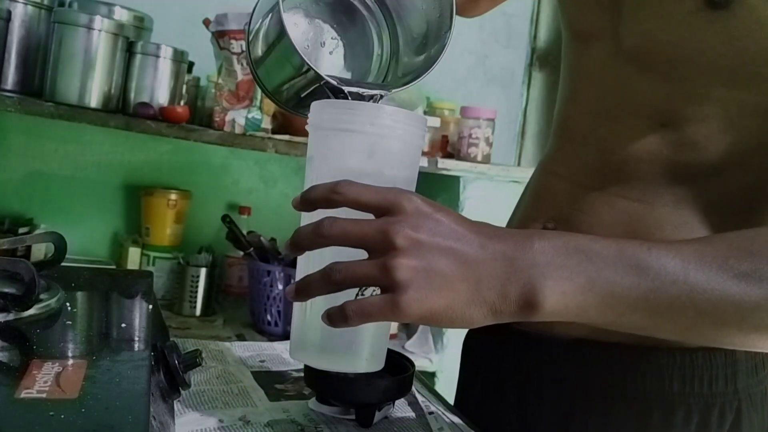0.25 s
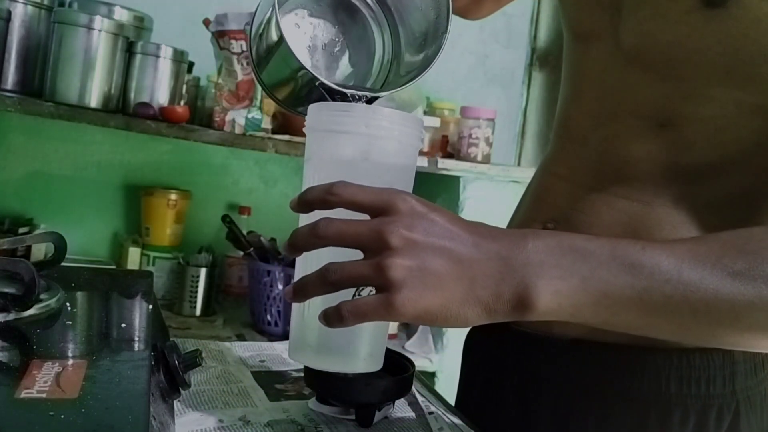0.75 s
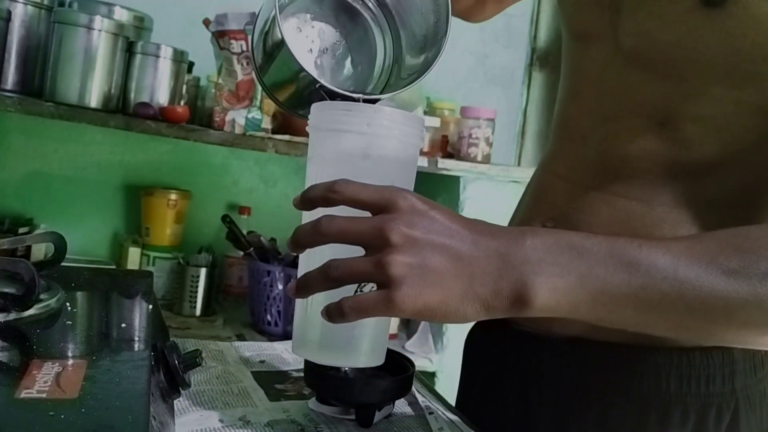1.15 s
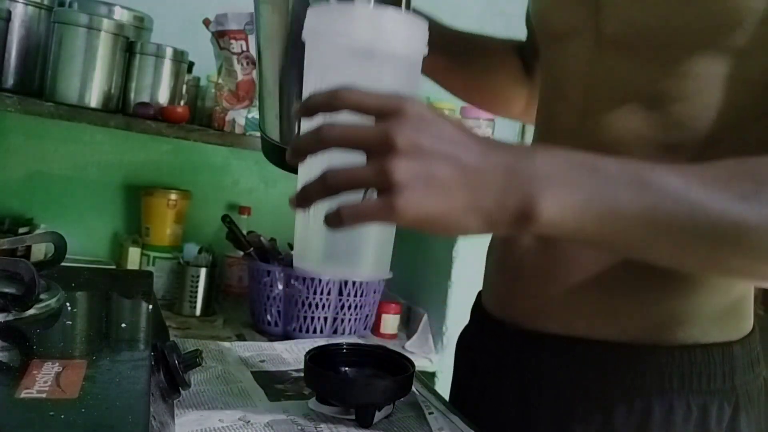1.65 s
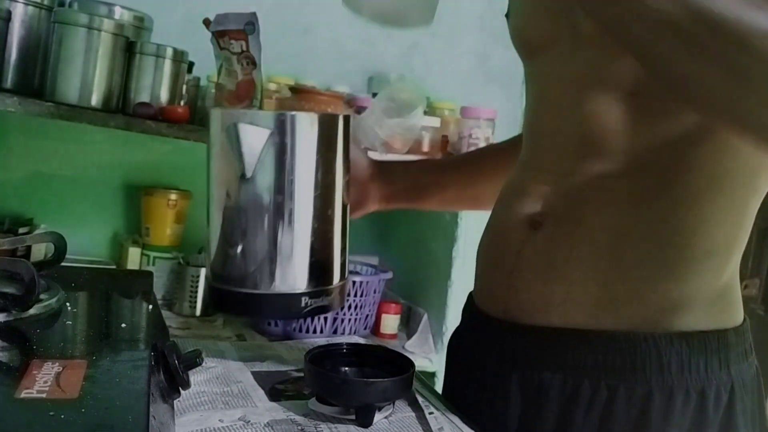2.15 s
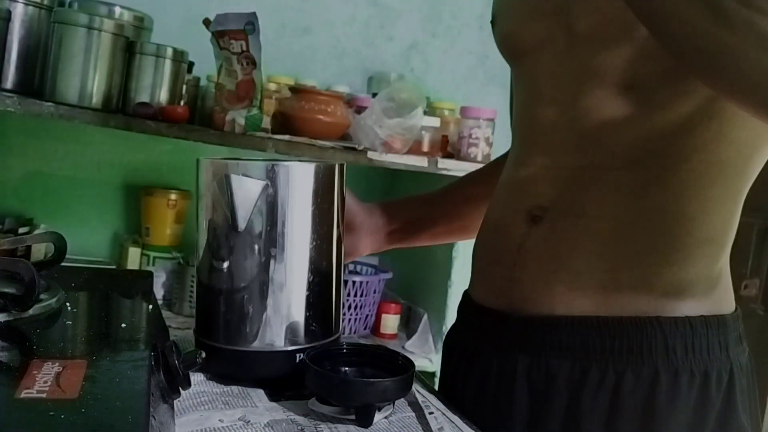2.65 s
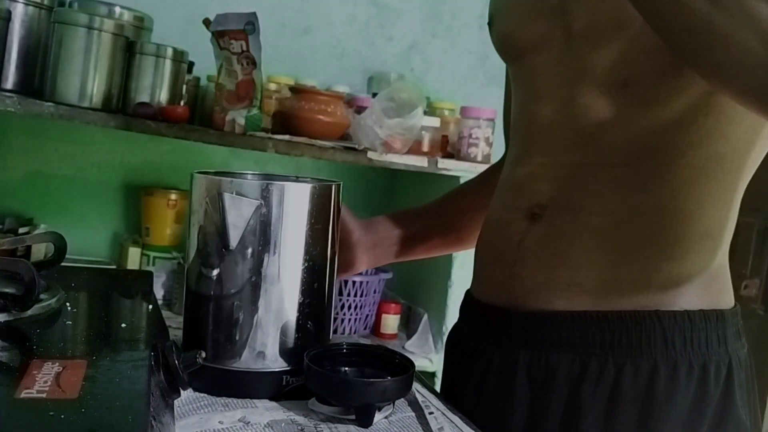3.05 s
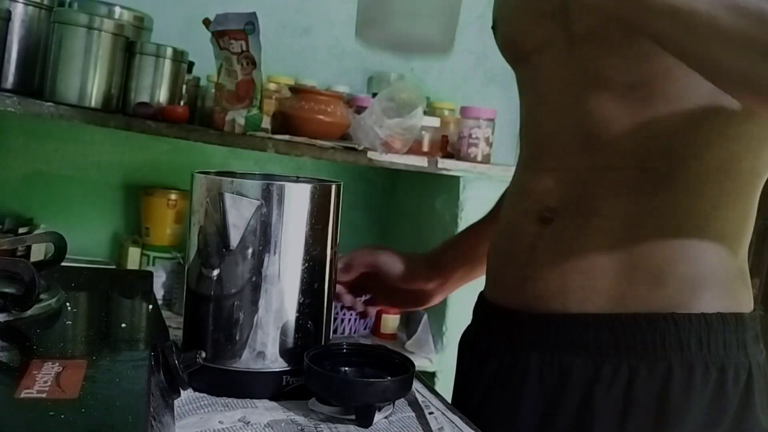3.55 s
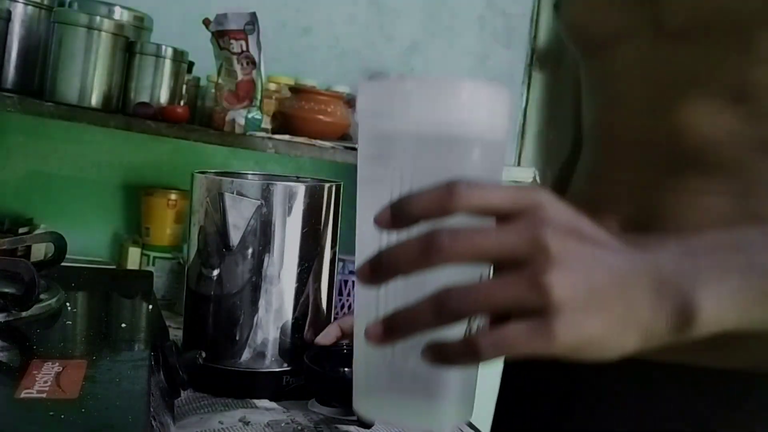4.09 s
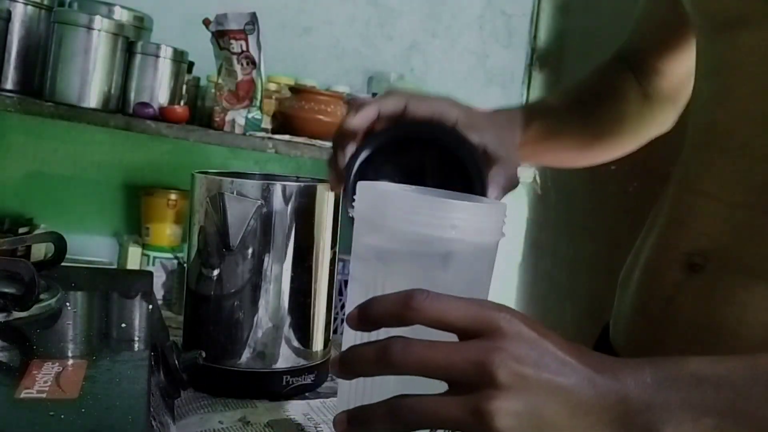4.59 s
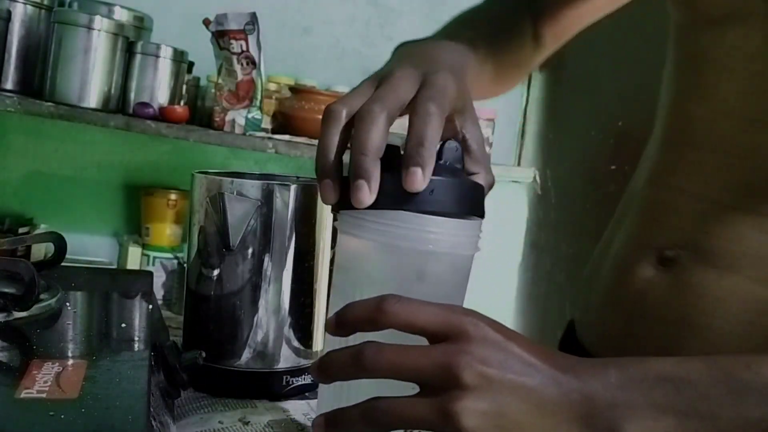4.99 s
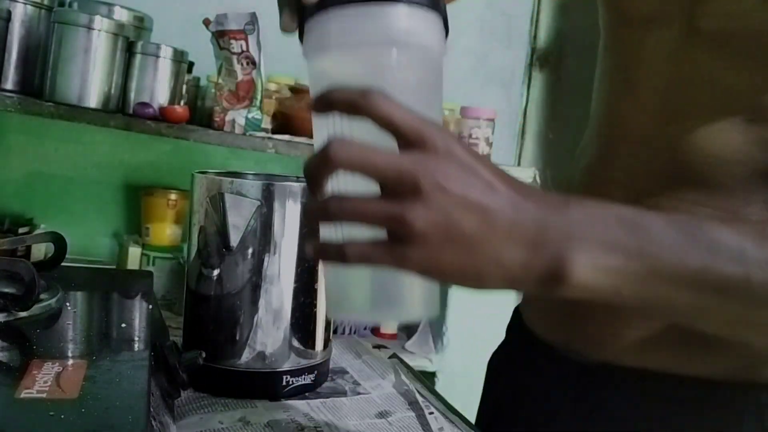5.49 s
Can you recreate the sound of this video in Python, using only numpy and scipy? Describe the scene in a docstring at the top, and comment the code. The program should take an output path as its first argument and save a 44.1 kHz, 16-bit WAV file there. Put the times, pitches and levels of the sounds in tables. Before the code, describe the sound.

Bright bubble plips and fine spray from a kettle's last dribble come first, with a faint distant horn to the right. Then the plastic bottle knocks, hard clicks scatter, and the metal kettle thuds twice quickly on the counter. Sparse handling rustles lead to sharp lid clicks, a thump, tiny squeaks and final bottle knocks. Close stereo pickup, short hard-room echo, deep engine rumble behind.

```python
"""Kettle and bottle in a small kitchen

Close up, the last of the water dribbles from a steel kettle into a plastic bottle: ringing bubbles and drops.
The kettle is set down, hands rub steel and plastic, and a lid is clicked and pressed on: dying rings and
shaped noise. Hard walls answer with a short decaying echo. Outside, traffic drones in wavering sines over
coloured noise, and a far horn sounds once as a cluster of rough tones. Two channels, left and right."""
import sys
import numpy as np
from scipy import signal
from scipy.fft import rfft, irfft
from scipy.io import wavfile

SR = 44100
rng = np.random.default_rng(int(sys.argv[2]) if len(sys.argv) > 2 else 0)


def unload_wav(signal):
    """Save mono or channel-first audio to the path in sys.argv[1] as 16-bit WAV at rate SR, clipped to [-1, 1]."""
    wavfile.write(
        sys.argv[1],
        SR,
        np.round(np.clip(np.atleast_2d(signal).T, -1, 1) * 32767).astype(np.int16),
    )


N = 252692   # samples

# Deep engine drone from the street. Each row: time [s], level [dB].
DRONE_LEVEL = [(0.0, -40.5), (0.06, -29.5), (0.27, -40), (0.57, -28.5), (0.64, -41), (0.72, -28),
               (0.8, -45), (1.02, -33), (1.07, -40), (1.16, -23), (1.26, -35.5), (2.6, -30), (2.86, -39.5),
               (2.9, -56), (2.97, -44.5), (4.02, -31), (4.12, -38.5), (4.84, -32.5), (4.91, -41),
               (5.12, -37.5), (5.19, -60), (5.23, -42), (5.39, -32.5), (5.51, -81), (5.54, -38),
               (5.73, -39)]
# Pitch of that drone. Each row: time [s], pitch [Hz].
DRONE_PITCH = [(0, 34.41), (0.95, 34.18), (1.4, 31.6), (5.35, 31.42), (5.5, 34.8)]
# Idling engines far off. Each row: pitch [Hz], level [dB], spread of the random pitch wander [Hz].
IDLING = [(16.9, -47.5, 1.47), (59.5, -56, 2.24), (120.5, -58.5, 4.17), (72.43, -49, 2.76),
          (148.2, -56.5, 3.07), (163.9, -58, 2.86), (180.5, -64.5, 4.13), (197.3, -69.5, 4.7),
          (225.9, -60, 5.28), (284.9, -60.5, 5.025)]
# Tones that swell and fade in the street noise, low hums and two higher ones.
# Each row: start [s], length [s], pitch [Hz], level [dB].
SWELLING_TONES = [(-0.2, 1.26, 82.9, -48), (0.295, 0.25, 498.5, -60.5), (0.966, 0.36, 610, -65),
                  (0.462, 0.14, 167.9, -49), (0.646, 0.39, 73, -46.5), (0.855, 0.31, 162, -49),
                  (1.071, 0.18, 45, -38.5), (1.326, 0.48, 284.8, -55.5), (1.5, 0.2, 161, -48.5),
                  (1.878, 0.92, 230.8, -47.5), (2.307, 0.48, 163.1, -48.5), (2.96, 0.43, 74.3, -48),
                  (3.05, 1.07, 229.4, -58), (3.353, 0.91, 201.8, -53.5), (3.65, 0.946, 72.06, -44.5),
                  (4.048, 0.49, 89, -44), (4.085, 0.47, 152.2, -46.5), (4.5, 1.9, 180.3, -55),
                  (5, 0.29, 72.7, -43), (5.218, 0.79, 147, -46.5)]
TONE_SWELL = 0.26   # share of a tone's length spent rising, and again falling
# One engine slows down: its note sags.
SLOWING_START_S, SLOWING_LENGTH_S, SLOWING_HZ, SAG_HZ_PER_S, SLOWING_DB = 0.2958, 3.77, 99.6, 5.7, -43
WAVER_DB = 1.47   # spread of the random level of the swelling tones and the slowing engine
# Broad street noise. Each row: time [s], level [dB].
STREET_LEVEL = [(0, -38.5), (1.4, -36), (2.4, -37.5), (3.1, -36.5), (4.2, -37.5), (5.2, -38.5),
                (5.73, -36.5)]
# Its spectrum. Each row: frequency [Hz], relative level [dB].
STREET_COLOUR = [(12, -41), (20, 6.5), (38, -2), (58, -11), (119, -17), (162, -15.5), (239, -23),
                 (418, -22.5), (495, -25.5), (555, -34.5), (612, -30), (720, -36), (900, -34.5),
                 (1280, -39), (1730, -38), (4870, -54.5), (8740, -57), (15700, -69.5)]
# Likeness of left and right, for street and echo. Each row: frequency [Hz], likeness [0 to 1].
LIKENESS = [(30, 0.99), (60, 1), (120, 0.96), (250, 0.6), (500, 0.38), (1000, 0), (3000, 0), (12000, 0.089)]

# Bubbles trapped by the dribble. Each row: time [s], level [dB], starting pitch [Hz], left over right [dB].
BUBBLES = [(0.135, -43.5, 1155, 5), (0.16, -50, 1130, 4), (0.225, -51, 1600, 0), (0.255, -48, 1720, -2),
           (0.35, -54, 1700, 0), (0.383, -51, 1680, 0), (0.425, -50, 1160, 5), (0.445, -46, 1600, -2),
           (0.66, -56, 1150, 0), (0.78, -51, 1550, 2), (1.188, -50, 1700, 0), (1.285, -51, 960, 0),
           (1.38, -50, 947.5, 0), (1.43, -54, 1740, 0), (0.2027, -52, 1070, 11), (0.2405, -40, 1666, -3),
           (0.405, -45, 1190, 15), (0.443, -48, 1280, -5), (0.454, -51, 1210, 5), (0.682, -53, 1680, 0),
           (0.737, -47, 1990, -2), (0.7517, -46, 1670, -2), (0.811, -40, 1790, -4),
           (0.827, -40.5, 1800, -1), (0.853, -46, 1645, -3), (1.016, -41.5, 1610, -2),
           (1.062, -43, 1605, -4), (1.099, -46, 1650, 0), (1.137, -47, 2030, 2), (1.188, -46, 2050, 0),
           (1.255, -49, 2060, 0), (1.316, -52, 980, 0), (1.336, -38, 1960, -2), (1.504, -39.5, 1468, -0.5)]
# Bursting droplets. Each row: time [s], level before the cluster's offsets [dB], middle pitch [Hz].
DROPLETS = [(.01, -46, 9900), (.205, -60, 4600), (.328, -48, 14870), (0.392, -52, 5840), (.425, -51, 15000),
            (0.494, -45.5, 7740), (.51, -50, 9700), (.012, -61, 3050), (0.558, -57, 2870), (.57, -60, 4300),
            (.606, -53.5, 3470), (.677, -65, 3300), (.602, -41, 8300), (0.673, -49, 14100),
            (.78, -50, 14600), (.885, -47, 9100), (.923, -55, 5740), (1.21, -54, 7340), (1.278, -50, 13700)]
# Fine spray of the stream. Each row: time [s], level [dB].
SPRAY_LEVEL = [(0, -72), (.14, -75), (.4, -69), (.7, -71.5), (.97, -75), (1.1, -71.5), (1.35, -78),
               (1.6, -89)]

# Decay of the kitchen's echo. Each row: frequency [Hz], t60 [s].
KITCHEN_T60 = [(200, 0.37), (1000, 0.2), (4000, 0.23), (9000, 0.13), (15000, 0.15)]
# Colour of the echo. Each row: frequency [Hz], relative level [dB].
KITCHEN_COLOUR = [(200, -10), (500, -7.5), (1500, -0.5), (4000, 1), (12000, 2)]
KITCHEN_DB = -0.5   # echo gain re the close sounds

HORN_START_S, HORN_LENGTH_S, HORN_PEAK_S, HORN_DB = 1.018, 0.46, 1.254, -65.5
HORN_CLIMB_DB, HORN_CLIMB_S, HORN_FADE_DB_PER_S = 18, 0.65, 70
HORN_HZ, HORN_SAG_HZ_PER_S = 448.3, 70   # the pitch whose multiples sound, and how it sags after the peak
# Rough horn tones at whole and half multiples of one pitch. Each row: multiple [ratio], relative level [dB].
HORN_TONES = [(6, -7), (6.5, -15), (7, 0), (7.5, -13), (8, -1), (9, -14)]

# Hollow knocks on the bottle. Each row: time [s], level before panning [dB], pitch [Hz], t60 [s].
KNOCKS = [(1.578, -18.5, 455.7, 0.032), (5.125, -39.5, 580, 0.062), (5.405, -27, 470, 0.033),
          (5.414, -16, 490, 0.026), (5.43, -32.5, 552, 0.087), (5.488, -42, 506, .07),
          (5.468, -31, 443, 0.059), (5.54, -46, 600, 0.049)]
KNOCK_SWELL_S, KNOCK_LEFT_DB = 0.0035, -4   # negative: louder on the right
# Sharp clicks. Each row: time [s], middle pitch of the wall's ring [Hz], level of each of its close
# modes [dB], their t60 [s], crack level [dB], left over right of the wall's ring [dB].
CLICKS = [(1.7144, 3060, -53, 0.034, -58, 0), (1.702, 5000, -70, .01, -65, 0),
          (1.7143, 3550, -47, 0.036, -64, -2), (1.722, 4000, -49, .03, -64, 1),
          (1.716, 4700, -54, .03, -68, 0), (1.739, 1950, -44, 0.028, -59, 0),
          (1.7325, 2110, -39, 0.025, -56, 0), (1.733, 1500, -56, 0.022, -66, 0),
          (1.741, 2670, -54, 0.016, -62, 0), (1.734, 6430, -54, .03, -62, 0),
          (1.752, 6300, -58, .03, -66, -2), (1.748, 2000, -48, 0.022, -57, -4),
          (1.758, 2000, -47.5, .025, -62, -4), (1.735, 4000, -51, .04, -66, 0),
          (1.76, 4000, -60, .03, -66, -2), (1.84, 4200, -62, .04, -70, 0), (1.785, 4100, -59, .03, -68, 0),
          (1.7, 4150, -61, 0.045, -70, -2), (1.826, 2050, -59, .05, -72, 0),
          (2.192, 3400, -60.5, 0.025, -65, -4), (2.8886, 3500, -63, .015, -52, 3),
          (2.888, 6100, -51.5, 0.011, -57, 4), (2.9445, 5000, -47, .009, -60, -4),
          (2.958, 6700, -54, .015, -64, 0), (2.957, 3600, -60, .012, -64, 0),
          (2.955, 1100, -52, 0.033, -62, 0), (2.98, 1500, -54, .025, -62, 0),
          (2.997, 1600, -56, 0.023, -65, 0), (3.4, 1450, -56, 0.023, -67, 0),
          (2.945, 1500, -52.5, 0.021, -54, -7), (2.964, 1240, -53, 0.02, -60, -7),
          (3.059, 1700, -60, 0.027, -63, -2), (3.095, 1250, -52.5, 0.026, -60, -4),
          (3.11, 1150, -55, .03, -64, -2), (3.124, 1500, -58, .025, -66, 0),
          (3.24, 1050, -52.5, 0.039, -56, 0), (3.15, 1280, -57, .025, -62, -2),
          (3.3, 1133, -53, 0.049, -57, -1), (3.831, 1800, -68, .019, -54, -1),
          (4.6244, 1630, -32.5, 0.013, -28.5, 0), (4.6246, 1400, -39, 0.0085, -60, 0),
          (4.645, 2600, -52, .02, -70, 0), (4.662, 810, -56, 0.036, -70, 0),
          (4.634, 1500, -44, 0.013, -44, 0), (4.644, 1800, -56, 0.023, -60, -2),
          (4.685, 1550, -58, .02, -68, 0), (5.2, 3400, -61, 0.027, -72, 0),
          (4.671, 1900, -52, 0.022, -62, 2), (4.706, 1500, -54, 0.016, -66, 0),
          (4.72, 1700, -58, 0.043, -70, 0), (4.74, 1200, -58, 0.033, -70, 2),
          (4.752, 1800, -59, .03, -72, 0), (4.765, 1900, -59, .03, -72, 0),
          (4.8625, 3600, -48, 0.034, -62, -2), (4.863, 3300, -46, 0.018, -62, 2),
          (4.865, 2320, -46.5, 0.064, -66, -5), (4.872, 1090, -44, 0.045, -62, 8),
          (4.886, 3100, -45, 0.02, -60, -2), (4.8637, 1210, -39.5, 0.028, -44.5, 2),
          (4.886, 2300, -61, 0.03, -50, -2), (4.895, 950, -57, .04, -66, 4),
          (5.123, 1740, -61, 0.02, -70, 4), (5.125, 2950, -54, 0.045, -74, -2),
          (5.201, 3800, -44, 0.042, -60, -2), (5.466, 3800, -60, .03, -70, 0),
          (5.1901, 1970, -40.5, 0.017, -34, -3), (5.193, 1030, -45, 0.018, -46, 7),
          (5.406, 1410, -57, .02, -59, 0), (5.412, 770, -48, .04, -64, 0), (5.54, 770, -54, .04, -66, 0),
          (5.4666, 1800, -61, .015, -55, -5), (5.7195, 1540, -46, 0.023, -44, -3)]
WALL_SPREAD = 0.13   # spread of the wall's close modes, share of the pitch
OVERTONE, OVERTONE_DB = 1.87, -11.5   # the wall's second mode: pitch ratio, level re the first
# Spectrum of the crack. Each row: frequency [Hz], relative level [dB].
CRACK_COLOUR = [(900, -14), (1500, -4), (3000, 3), (4600, 11.5), (6000, 7), (8500, 11.5), (11000, -1.5),
                (15700, -15)]
# Treble rings of the hard plastic. Each row: frequency [Hz], relative level [dB], t60 [s].
PLASTIC = [(2970, 5.5, 0.025), (7900, 2, 0.047), (3860, 6, 0.02), (4990, 6.5, 0.013), (6170, -1, 0.034),
           (8560, 0, 0.04), (8750, -5, 0.025), (10000, 0, 0.021), (11300, -20, 0.039)]
PLASTIC_DB, PLASTIC_LEFT_DB = -14, 4   # offset re the crack; the treble modes beam to the left
TREBLE_LEFT_DB = 0.3   # left over right, for crack and hiss
KETTLE_DOWN_S = 2.962
KETTLE_BOUNCE_S, KETTLE_BOUNCE_DB = 0.02695, -4.5   # it rocks and lands once more: delay, level re the first
# The kettle's body booms on the counter. Each row: frequency [Hz], level at first landing [dB], t60 [s].
KETTLE_MODES = [(232, -33.5, 0.27), (291, -30, 0.11), (340, -41, 0.23), (427, -48, 0.093),
                (527, -39, 0.051), (656, -55, 0.05)]
LID_HOME_S = 5.19
# The lid snaps home and thumps the full bottle. Each row: frequency [Hz], level [dB], t60 [s].
BOTTLE_MODES = [(286, -35, 0.092), (334, -27, 0.087), (392, -28, 0.067), (460, -25.5, 0.051),
                (596, -25, 0.026), (824, -51, 0.019)]
THUMP_SWELL_S = 0.0019   # for kettle and lid

# Bursts of rubbing noise and the noisy tails that follow clicks. Each row: time of full level [s],
# rise [s], hold [s], then the full levels of hiss [dB], body [dB] and hollow rumble [dB].
NOISE_BURSTS = [(1.731, 0.051, .005, -53.5, -57, -53), (1.802, .02, 0.034, -72, -79, -65),
                (2.076, 0.016, 0.0028, -54, -55.5, -52), (2.134, .02, .03, -79, -77, -61),
                (2.876, 0.035, 0.04, -69, -63, -68), (2.953, 0.044, .01, -62, -54.5, -55),
                (3.006, 0.067, 0.16, -65, -58.5, -60.5), (3.266, 0.1, 0.0082, -69, -64, -57),
                (3.831, 0.007, .003, -69, -81, -79), (3.893, 0.037, 0.061, -72, -65, -62),
                (4.18, .025, .02, -66, -78, -89), (4.215, 0.027, .005, -65.5, -64, -81),
                (4.27, 0.033, 0.009, -67.5, -73, -75), (4.5, 0.05, .01, -68, -72, -76),
                (4.648, 0.034, .01, -49.5, -50.5, -57), (4.716, 0.039, 0.06, -71, -58.5, -60),
                (4.862, 0.019, 0.0036, -56, -50.5, -59), (4.98, 0.062, 0.014, -71, -64, -81),
                (5.07, 0.096, 0.0046, -69, -63, -57), (5.12, 0.044, 0.065, -83, -60.5, -56.5),
                (5.204, 0.033, 0.0067, -53, -54.5, -72), (5.278, 0.076, 0.12, -69.5, -62, -84),
                (5.403, 0.012, 0.17, -70, -62, -52.5)]
# Spectrum of the bright hiss. Each row: frequency [Hz], relative level [dB].
HISS_COLOUR = [(2350, -16), (4000, -8.5), (4330, -17.5), (7380, -5), (9120, -4), (12300, -19.5),
               (15700, -21)]
# Spectrum of the duller body. Each row: frequency [Hz], relative level [dB].
BODY_COLOUR = [(700, 4.5), (1150, 3), (1700, 5), (2250, -4.5), (3050, -0.5), (3700, 1), (4500, -2),
               (6000, -19)]
# Spectrum of the hollow rumble. Each row: frequency [Hz], relative level [dB].
HOLLOW_COLOUR = [(300, -18), (450, 6), (650, -2), (900, -19), (1300, -38)]
BURST_CLIMB_DB = 24   # a burst gains this much during its rise
HISS_FADE, BODY_FADE, HOLLOW_FADE = 310, 285, 420   # dB per s after the hold
# Squeaks of rubbed steel and plastic, the kettle's base on the counter, then the lid's thread.
# Each row: time of full level [s], hold [s], level [dB], pitch [Hz], spread of the pitch wobble [Hz].
SQUEAKS = [(1.725, .02, -72, 14900, 500), (3.0, .025, -77, 3350, 200), (3.057, 0.0077, -71, 6200, 150),
           (3.072, .004, -70, 6560, 150), (3.098, .02, -69, 3300, 201), (3.15, 0.039, -73, 3310, 249.4),
           (3.263, 0.004, -72, 6100, 130), (3.265, 0.003, -73, 6700, 100), (4.82, 0.014, -70, 3030, 250),
           (4.95, 0.035, -69, 3230, 90), (5.061, 0.01, -72, 3270, 150), (5.248, 0.038, -63.5, 3100, 109.6),
           (5.3, 0.02, -65, 3150, 90), (5.33, 0.05, -67, 3080, 140), (5.41, 0.082, -68, 3087, 160)]
SQUEAK_RISE_S, SQUEAK_FADE_DB_PER_S, SQUEAK_FLUTTER_DB = 0.02, 550, 4
SQUEAK_WOBBLES_PER_S = 220

CUTOFF_HZ = 15800   # top of the finished sound


def amp(db):
    """dB to gain."""
    return 10 ** (np.asarray(db) / 20)


def rms_one(x):
    """Scale to rms 1."""
    return x / np.sqrt(np.mean(x ** 2) + 1e-20)


def level_in_time(rows):
    """Read a curve of time and value sample by sample."""
    s, value = np.transpose(rows)
    return np.interp(np.arange(N) / SR, s, value)


def span(rows, fade=0.0015):
    """1 while a curve lasts, 0 outside, with short fades inside its ends."""
    t = np.arange(N) / SR
    return np.clip(np.minimum(t - rows[0][0], rows[-1][0] - t) / fade, 0, 1)


def drift(rate):
    """Smooth random wander of rms 1; a higher rate [Hz] wanders faster."""
    r = np.exp(-80 * np.pi * rate / SR)   # computed at every 40th sample
    white = rng.standard_normal(N // 40 + 2002)
    slow = signal.lfilter([1], [1, -2 * r, r * r], white)[2000:]   # drop the filter's start-up
    return np.interp(np.arange(N) / 40, np.arange(len(slow)), rms_one(slow))


def at_hz(points, hz):
    """Read a table on a log-frequency axis."""
    points = np.array(points)
    return np.interp(np.log(hz), np.log(points[:, 0]), points[:, 1])


def colour(x, spectrum):
    """Give a wide noise a spectrum, silent beyond the table's ends; rms 1."""
    hz = np.maximum(np.fft.rfftfreq(N, 1 / SR), 1)
    edge = (hz > spectrum[0][0]) & (hz < spectrum[-1][0])
    return rms_one(irfft(rfft(x) * amp(at_hz(spectrum, hz)) * edge, N))


def tone(hz):
    """A sine of rms 1 on a pitch curve, from a random phase."""
    return np.sqrt(2) * np.sin(2 * np.pi * (np.cumsum(hz) / SR + rng.random()))


def swell(start, length, share):
    """A soft rise, a plateau and a soft fall."""
    t = (np.arange(N) / SR - start) / length
    return np.sin(np.pi / 2 * np.clip(np.minimum(t, 1 - t) / share, 0, 1)) ** 2


def burst(s, rise, hold, fade, rise_db=BURST_CLIMB_DB):
    """Gain that climbs to 1 at s by rise_db per rise, holds, then dies by fade dB per second."""
    t = np.arange(0, N, 16) / SR - s   # one gain for every 16 samples
    db = np.minimum(rise_db * t / rise, 0) - fade * np.maximum(t - hold, 0)
    return np.repeat(amp(db), 16)[:N]


def add(out, s, level_db, hz, t60, rise=0., attack=0.000081, left_db=0., lag=0):
    """Add one dying ring; its pitch climbs by the share rise per t60, and lag samples delay the left."""
    t = np.arange(int(t60 * SR)) / SR
    ring = np.sin(2 * np.pi * hz * (t + rise * t ** 2 / t60 / 2))
    wave = ring * amp(-60 * t / t60) * (1 - np.exp(-t / attack))
    for channel, side in enumerate((1, -1)):
        at = round(s * SR) + max(side * lag, 0)   # a negative lag delays the right
        out[channel, at:at + len(t)] += (amp(level_db + side * left_db / 2) * wave)[:max(N - at, 0)]


def street_tones():
    """Engine drones, swelling tones and one sagging note: wavering sines, the same in both channels."""
    tones = amp(level_in_time(DRONE_LEVEL)) * tone(level_in_time(DRONE_PITCH))
    for hz, level_db, wander_hz in IDLING:
        tones += amp(level_db + 2.54 * drift(4.1)) * tone(hz + wander_hz * drift(3.027))
    for s, length, hz, level_db in SWELLING_TONES:
        level = amp(level_db + WAVER_DB * drift(21))
        tones += level * swell(s, length, TONE_SWELL) * tone(np.full(N, hz))
    sagging = SLOWING_HZ - SAG_HZ_PER_S * (np.arange(N) / SR - SLOWING_START_S)
    level = amp(SLOWING_DB + WAVER_DB * drift(7.7))
    tones += level * swell(SLOWING_START_S, SLOWING_LENGTH_S, 0.33) * tone(sagging)
    return tones


def street():
    """Tones over a broad rumble whose left and right part toward the treble."""
    mid, side = rng.standard_normal((2, N))
    alike = np.clip(at_hz(LIKENESS, np.maximum(np.fft.rfftfreq(N, 1 / SR), 1)), 0, 1)
    mid = irfft(rfft(mid) * np.sqrt(1 + alike), N)
    side = irfft(rfft(side) * np.sqrt(1 - alike), N)
    noise = np.array([colour(mid + side, STREET_COLOUR), colour(mid - side, STREET_COLOUR)])
    return street_tones() + amp(level_in_time(STREET_LEVEL)) * noise


def bubbles_and_droplets():
    """Trapped air rings and climbs in pitch; droplets burst as little clusters of rings."""
    out = np.zeros((2, N))
    for s, level_db, hz, left_db in BUBBLES:
        add(out, s, level_db, hz, 40 / hz, rise=0.083, attack=0.00075, left_db=left_db, lag=3)
    for s, level_db, hz in DROPLETS:
        for k, (late, size) in enumerate(rng.random((14, 2))):
            ring_hz = hz * (1 + 0.14 * (size - 0.5))
            add(out, s + 0.0016 * k * late, level_db - 3.5 - 0.61 * k, ring_hz, 45 / hz, rise=0.042, lag=2)
    for when, size, force in rng.random((300, 3)):   # the many faint bubbles between the clear ones
        hz = 900 * 3.21 ** size
        add(out, 1.45 * when, -60 + 12 * force, hz, 30 / hz, rise=0.18, attack=0.0041, lag=3)
    return out


def spray():
    """A dense crackle of tiny rings: small drops ring high, large ones low."""
    out = np.zeros((2, N))
    for when, size, force, where in rng.random((4000, 4)):
        hz = 15000 * 5.18 ** -size
        level_db = -3.2 * np.log(force + 0.02) - 16.0 * size
        lag = int(12 * where - 6)
        add(out, 1.8 * when, level_db, hz, 30 / hz, rise=0.072, attack=0.00034, lag=lag)
    level = amp(level_in_time(SPRAY_LEVEL) + 1.1 * drift(22)) * span(SPRAY_LEVEL)
    return level * out / np.sqrt(np.mean(out[:, :int(1.6 * SR)] ** 2))


def water():
    """The dribble close by: bubbles, droplets and spray."""
    return bubbles_and_droplets() + spray()


def kitchen(x):
    """Dense echoes off tiles and pots: decaying noise, alike on both sides in the bass, not in the treble."""
    t = np.arange(SR // 2) / SR
    echo, white = 0, rng.standard_normal((2, len(t)))
    for low in 125 * 2. ** np.arange(7):   # each octave dies at its own rate
        octave = signal.butter(2, [low, 2 * low], "band", fs=SR, output="sos")
        band = signal.sosfilt(octave, white)
        alike = np.clip(at_hz(LIKENESS, low), 0, 1)   # long waves reach both microphone ports alike
        band = alike * band[0] + np.sqrt(1 - alike ** 2) * band
        decay_db = -60 * t / at_hz(KITCHEN_T60, 1.36 * low)
        echo = echo + band * amp(at_hz(KITCHEN_COLOUR, 1.4 * low) + decay_db)
    echo = echo * np.clip(t / 0.005, 0, 1)   # the echo builds up over the first 5 ms
    return signal.fftconvolve(x, echo / np.sqrt(np.sum(echo ** 2) / 2), axes=1)[:, :N]


def horn():
    """Rough horn tones at whole and half multiples of one pitch, fluttering in level and pitch."""
    sag = np.clip(HORN_SAG_HZ_PER_S * (np.arange(N) / SR - HORN_PEAK_S), 0, 7)   # 7 Hz at most
    pitch = HORN_HZ + 1.2 * drift(40) - sag
    tones = np.zeros(N)
    for k, level_db in HORN_TONES:
        tones += amp(level_db + 2.8 * drift(35)) * tone(k * pitch + 13 * drift(90))
    blown = burst(HORN_PEAK_S, HORN_CLIMB_S, 0, HORN_FADE_DB_PER_S, rise_db=HORN_CLIMB_DB)
    return amp(HORN_DB) * swell(HORN_START_S, HORN_LENGTH_S, 0.14) * blown * tones


def treble_sides():
    """Left and right gains of the close treble."""
    return amp([[TREBLE_LEFT_DB / 2], [-TREBLE_LEFT_DB / 2]])


def knocks_and_thumps():
    """Hollow bodies ring low after a soft swell: bottle knocks, the landing kettle, the lid going home."""
    out = np.zeros((2, N))
    for s, level_db, hz, t60 in KNOCKS:
        add(out, s, level_db, hz, t60, attack=KNOCK_SWELL_S, left_db=KNOCK_LEFT_DB, lag=4)
    thumps = [(KETTLE_DOWN_S, 0, KETTLE_MODES),
              (KETTLE_DOWN_S + KETTLE_BOUNCE_S, KETTLE_BOUNCE_DB, KETTLE_MODES),
              (LID_HOME_S, 0, BOTTLE_MODES)]
    for s, force_db, modes in thumps:
        for hz, level_db, t60 in modes:
            add(out, s, level_db + force_db, hz, t60, attack=THUMP_SWELL_S, lag=4)
    return out


def clicks():
    """Each click rings two split wall modes and the plastic's treble modes, with a short noise crack."""
    out = np.zeros((2, N))
    t = np.arange(int(0.04 * SR)) / SR
    noise = colour(rng.standard_normal((2, N)), CRACK_COLOUR)
    for s, wall_hz, wall_db, t60, crack_db, left_db in CLICKS:
        for k, (late, detune) in enumerate(rng.random((4, 2))):   # an uneven wall splits each ring
            hz = wall_hz * (1 + WALL_SPREAD * ((k + detune) / 4 - 0.5))
            add(out, s + 0.001 * late, wall_db, hz, t60, left_db=left_db, lag=3)
            add(out, s + 0.00155 * late, wall_db + OVERTONE_DB, OVERTONE * hz, t60, left_db=left_db, lag=3)
        for hz, mode_db, mode_t60 in PLASTIC:
            level_db = crack_db + PLASTIC_DB + mode_db + rng.normal(0, 1.0)
            add(out, s, level_db, hz, mode_t60, attack=0.0001, left_db=PLASTIC_LEFT_DB, lag=1)
        at = round(s * SR)
        crack = amp(crack_db - 60 * t / 0.021)[:N - at]   # t60 of 21 ms
        out[:, at:at + len(t)] += crack * noise[:, at:at + len(t)] * treble_sides()
    return out


def squeaks():
    """Rubbed surfaces squeak as fluttering, wobbling sines."""
    out = np.zeros(N)
    for s, hold, level_db, hz, wobble_hz in SQUEAKS:
        level = amp(level_db + SQUEAK_FLUTTER_DB * drift(200))
        envelope = burst(s, SQUEAK_RISE_S, hold, SQUEAK_FADE_DB_PER_S)
        out += level * envelope * tone(hz + wobble_hz * drift(SQUEAK_WOBBLES_PER_S))
    return out


def rubbing_and_tails():
    """Dense uneven noise in bursts and in tails after clicks: bright hiss, duller body, hollow rumble."""
    unevenness_db = 3.1 * np.minimum(rng.exponential(1, N), 5) + 2.0 * drift(30)
    grains = rng.standard_normal((3, 2, N)) * amp(unevenness_db)
    hiss, body, hollow = np.zeros((3, N))
    for s, rise, hold, hiss_db, body_db, hollow_db in NOISE_BURSTS:
        hiss += amp(hiss_db) * burst(s, rise, hold, HISS_FADE)
        body += amp(body_db) * burst(s, rise, hold, BODY_FADE)
        hollow += amp(hollow_db) * burst(s, rise, hold, HOLLOW_FADE)
    bright = hiss * treble_sides() * colour(grains[0], HISS_COLOUR)
    dull = body * colour(grains[1], BODY_COLOUR)
    low = hollow * colour(grains[2].sum(axis=0), HOLLOW_COLOUR)   # the same in both channels
    return bright + dull + low


def scene():
    """Close sounds with their room, and the street beyond; the horn lies to the right."""
    close = water() + knocks_and_thumps() + clicks() + rubbing_and_tails() + squeaks()
    return close + amp(KITCHEN_DB) * kitchen(close) + street() + horn() * amp([[-1.5], [1.5]])


def record(dry):
    """A steep low-pass cuts the top of the treble."""
    return signal.sosfilt(signal.ellip(12, .2, 70, CUTOFF_HZ, fs=SR, output="sos"), dry)


dry = scene()
out = record(dry)
unload_wav(out)
```